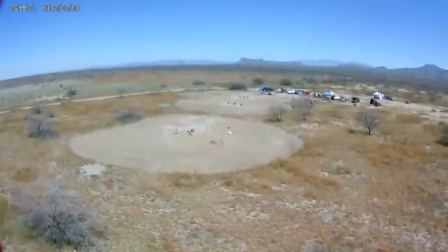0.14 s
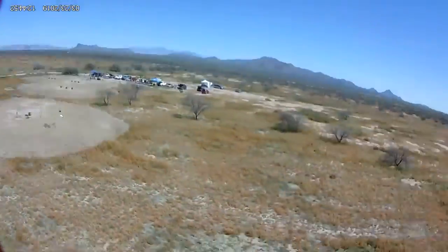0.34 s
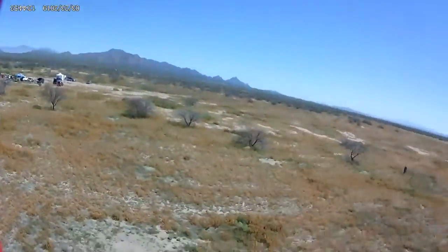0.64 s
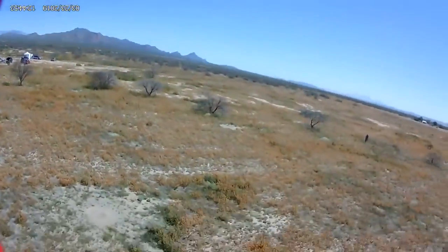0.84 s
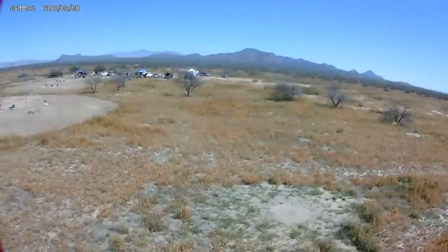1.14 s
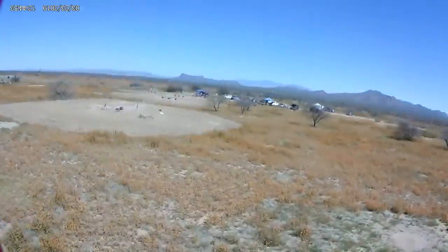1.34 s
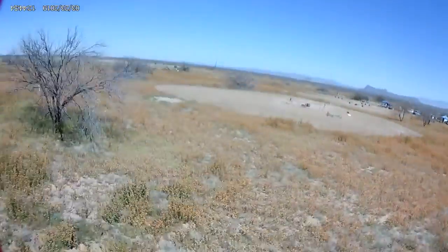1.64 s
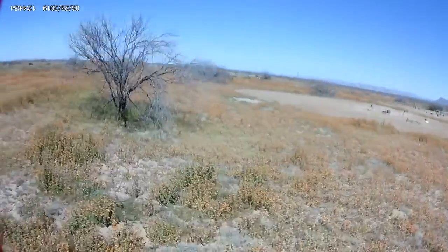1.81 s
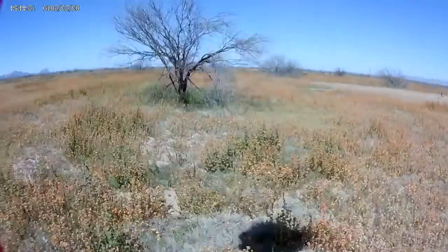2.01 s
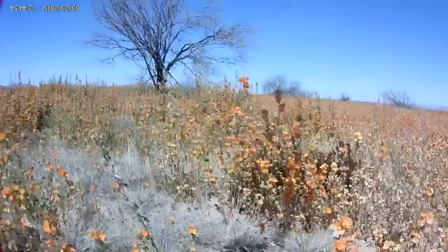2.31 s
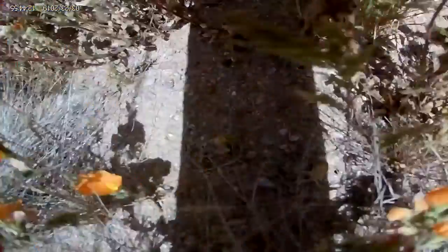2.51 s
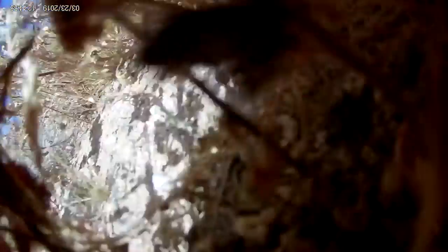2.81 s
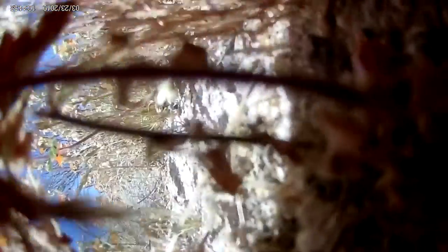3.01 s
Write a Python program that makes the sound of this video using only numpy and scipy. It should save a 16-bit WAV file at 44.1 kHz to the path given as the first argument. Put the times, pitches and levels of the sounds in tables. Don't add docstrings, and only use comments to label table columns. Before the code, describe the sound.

Twigs crack and snap against a hollow case after a quiet, windy descent with sparse ticks; stems knock, heavy blows overload the on-board microphone, then leafy scraping thins out in the open, without echo.

```python
import sys
import numpy as np
from scipy import signal
from scipy.fft import rfft, irfft
from scipy.io import wavfile
from scipy.ndimage import uniform_filter1d

SR = 44100
rng = np.random.default_rng(int(sys.argv[2]) if len(sys.argv) > 2 else 0)


def put_to_file(sound):
    columns = np.atleast_2d(sound).T
    safe = np.clip(columns, -1, 1)
    whole_steps = np.round(safe * 32767)
    wavfile.write(sys.argv[1], SR, whole_steps.astype(np.int16))


def natural_amplitude(level_db):
    exponent = np.asarray(level_db, float) / 20
    return 10 ** exponent


N = 138915


def rms_one(x):
    return x / np.sqrt(np.mean(x ** 2) + 1e-20)


def in_time(rows):
    s, *columns = np.transpose(rows)
    return [np.interp(np.arange(N) / SR, s, column) for column in columns]


def at_hz(points, hz):
    point_hz, point_db = np.transpose(points)
    return np.interp(np.log(hz), np.log(point_hz), point_db)


def drift(rate):
    r = np.exp(-80 * np.pi * rate / SR)
    slow = signal.lfilter([1], [1, -2 * r, r * r], rng.standard_normal(N // 40 + 2002))
    slow = rms_one(slow[2000:])
    return np.interp(np.arange(N) / 40, np.arange(len(slow)), slow)


def filtered(x, order, hz, kind="low"):
    return signal.sosfilt(signal.butter(order, hz, kind, fs=SR, output="sos"), x)


def ring(force, hz, t60):
    r, w = natural_amplitude(-60 / (t60 * SR)), 2 * np.pi * hz / SR
    return signal.lfilter([0, np.sin(w)], [1, -2 * r * np.cos(w), r * r], force + 1e-18)


def add(out, s, sound):
    i = int(s * SR)
    out[i:i + len(sound)] += sound[:N - i]


def strikes(events, modes, width, tilt_db, grit_hz, attack_s):
    case_spread_db, grit_fade_db_per_s = 2.0, 1496
    soft_contact = 2.61
    out, t = np.zeros(N), np.arange(SR // 4) / SR
    first_touch = t == t[40]
    grit = rng.standard_normal((len(events), len(t)))
    spread = rng.standard_normal((len(events), len(modes) + 1))
    for (s, db, hz, t60, last_db), rough, chance in zip(events, grit, spread):
        force = rough * natural_amplitude(-60 * t / max(t60, .003)) * np.minimum(t / attack_s, 1)
        crack = ring(force, hz, 6.84 / (width * hz))
        dull = filtered(force * natural_amplitude(-grit_fade_db_per_s * t), 3, grit_hz)
        grit_db = tilt_db if modes else last_db
        sound = crack / np.abs(crack).max() + natural_amplitude(grit_db) * dull / np.abs(dull).max()
        if modes:
            body = np.zeros(len(t))
            for (mode_hz, mode_db, mode_t60), luck in zip(modes, chance):
                body += natural_amplitude(mode_db + case_spread_db * luck) * ring(first_touch, mode_hz, mode_t60)
            sound = sound + natural_amplitude(last_db) * body / np.abs(body).max()
            sound = filtered(sound, 4, min(grit_hz, soft_contact * hz))
        add(out, s, natural_amplitude(db) * sound)
    return filtered(out, 2, 260, "high")


def wind():
    # time in seconds, level in dB, brightness in dB per octave.
    gusts = [(0, -61.5, -9), (.12, -52, 5), (.23, -45.5, 3.5), (.5, -49, -1), (.8, -57.5, -1.5),
             (1.0, -50, 5), (1.25, -47, 2.5), (1.6, -44.5, 4.5), (1.9, -46.5, 3), (2.08, -46.5, 0),
             (2.13, -54.5, -5), (2.4, -54, -5.5), (2.7, -62, -4.5), (2.95, -61.5, -1), (3.15, -62.5, 6)]
    # pitch in Hz, level in dB per Hz.
    wind_colour = [(15, -36), (25, 5), (147, 7.5), (408, -0.5), (477, -8.5), (545, -12.5), (650, -13),
                   (1290, -30), (5000, -128), (6500, -99), (11000, -120)]
    patchy_db = .8
    level_db, tilt_db = in_time(gusts)
    out, shared, white = 0, drift(7.0), rng.standard_normal((2, N))
    edges = 20 * 2 ** np.arange(0, 8.4, 1 / 3)
    for k, (low, high) in enumerate(zip(edges, edges[1:])):
        band = filtered(white[k % 2], 2, [low, high], "band")
        hz = np.sqrt(low * high)
        lumps_db = patchy_db * (.35 * shared + drift(9.0))
        out = out + band * natural_amplitude(at_hz(wind_colour, hz) + tilt_db * np.log2(hz / 250) + lumps_db)
    out = filtered(out, 4, 2050)
    return natural_amplitude(level_db) * out / np.sqrt(uniform_filter1d(out ** 2, size=30000))


def rigging_ticks():
    # start in seconds, peak in dB, contact pitch in Hz, contact t60 in seconds, ring in dB.
    ticks = [(.51, -56, 1180, .02, -4), (.737, -54, 1120, 0.016, -8), (.844, -48.5, 1010, 0.021, -17),
             (.8853, -45.5, 3800, 0.0093, -5), (.8875, -27.5, 1730, 0.025, -3.5),
             (.965, -66, 4000, 0.43, -10), (1.0095, -43, 1190, 0.02, -0.5), (1.145, -67, 4450, .15, -6),
             (1.2158, -37.5, 1560, 0.037, 2.5), (1.228, -61, 4100, 0.23, 8), (1.334, -48, 1000, 0.043, -21),
             (1.871, -51, 1290, 0.047, -4), (2.06, -55, 1810, 0.092, 10), (2.167, -43, 1000, 0.042, -13),
             (2.353, -56.5, 3600, 0.032, 4.5), (2.436, -40, 834, 0.031, -6), (2.437, -56.5, 4180, .04, -22)]
    # pitch in Hz, level in dB, t60 in seconds.
    lid = [(612, 26.5, 0.087), (825, 24, 0.067), (1000, 4, 0.081), (1417, 20, .04), (1650, 8.5, 0.11),
           (2270, 15.5, 0.039), (2710, 6, 0.044), (4000, 8, 0.03)]
    return strikes(ticks, lid, width=0.41, tilt_db=-39, grit_hz=4100, attack_s=0.0014)


def drag():
    # time in seconds, level in dB, brightness in dB per octave.
    scrape = [(2.44, -63.5, -10.5), (2.49, -54.5, -9.5), (2.55, -25.5, -2), (2.6, -22, -5.5),
              (2.672, -36.5, 0), (2.69, -57, -2), (2.708, -39, 6.5), (2.727, -27, 16.5),
              (2.74, -28.5, -0.5), (2.8, -15, 5.5), (2.86, -19.5, 1), (2.9, -29, -0.5), (2.965, -34.5, 2.5),
              (3.0, -29.5, -0.5), (3.02, -26, 4), (3.07, -38.5, -4), (3.09, -46, -2.5), (3.15, -42, 2)]
    # pitch in Hz, level in dB per Hz.
    scrape_colour = [(250, -15), (620, 5), (1200, -7), (1800, -6), (2770, -7.5), (4700, -7), (6500, -40),
                     (7800, -28.5)]
    grains_per_s, grain_spread_db, grain_cycles = 16000, 2.8, 9.0
    level_db, tilt_db = in_time(scrape)
    sizes = natural_amplitude(grain_spread_db * np.minimum(rng.exponential(1, N), 3.5)) * rng.choice([-1, 1], N)
    clicks = sizes * (rng.random(N) < grains_per_s / SR)
    pitches, dealt = np.geomspace(300, 7500, 28), rng.integers(0, 28, N)
    patches = [natural_amplitude(3.1 * drift(25.0)) for _ in range(7)]
    out = np.zeros(N)
    for k, hz in enumerate(pitches):
        grains = rms_one(ring(clicks * (dealt == k), hz, grain_cycles / hz))
        colour = natural_amplitude(at_hz(scrape_colour, hz) + tilt_db * np.log2(hz / 2500)) * np.sqrt(hz)
        out += colour * patches[k // 4] * grains
    out = filtered(out, 2, 280, "high")
    return natural_amplitude(level_db + 0.27 * drift(58.0)) * rms_one(out)


def stem_knocks():
    # start in seconds, peak in dB, contact pitch in Hz, contact t60 in seconds, ring in dB.
    knocks = [
        (2.1897, -20, 2570, 0.01, -6),
        (2.1918, -13.5, 2170, 0.014, 3.5),
        (2.2303, -25.5, 1480, 0.014, -4.5),
        (2.26, -40, 2920, 0.028, 11),
        (2.2808, -13.5, 1650, 0.018, 1),
    ]
    # pitch in Hz, level in dB, t60 in seconds.
    case = [(802, 0, .058), (985, -12, .04), (1362, -9, .04), (1637, -7, .038), (2148, -9, .03),
            (2735, -22, .045), (4000, -20, .025)]
    return strikes(knocks, case, width=0.64, tilt_db=-4.5, grit_hz=4810, attack_s=0.0017)


def twig_snaps():
    # start in seconds, peak in dB, pitch in Hz, t60 in seconds, broad grit in dB.
    snaps = [(2.464, -37, 1800, 0.032, -5.5), (2.492, -41.5, 1650, 0.027, -8),
             (2.507, -34.5, 3800, 0.063, -10), (2.535, -39, 4000, 0.093, -13),
             (2.5562, -10, 3800, 0.037, -3), (2.5775, -10, 1630, 0.023, -23),
             (2.5945, -25, 2000, .025, -14), (2.6115, -23, 1590, 0.013, -23),
             (2.6395, -27, 4200, 0.017, -16), (2.708, -31.5, 3000, .06, -17), (2.72, -31, 2820, 0.064, -15),
             (2.727, -33.5, 2520, 0.032, -17), (2.744, -37, 1650, 0.029, -12),
             (2.761, -32, 2470, 0.021, -3), (2.7934, 13, 2067, 0.0088, -8), (2.812, -36, 4500, 0.081, -19),
             (2.8262, -18.5, 3070, 0.043, -12), (2.8285, -11, 1430, 0.042, -7),
             (2.834, -14, 3430, 0.029, -25), (2.85, -30, 3530, 0.022, -5), (2.872, -30, 2470, 0.04, -17),
             (2.902, -37, 1470, 0.027, 1), (2.9138, -32.5, 2550, 0.036, -9), (2.941, -40, 2300, .025, -9),
             (2.951, -31, 2400, 0.074, -2.5), (2.9822, -33.5, 1700, 0.04, -1), (3.0025, -47, 2130, .02, -9),
             (3.011, -29.5, 2140, 0.074, -8), (3.0165, -22.5, 2350, 0.011, -4.5),
             (3.0635, -43, 990, 0.03, -11), (3.139, -48.5, 1690, .082, -8)]
    # start in seconds, peak in dB, pitch in Hz, t60 in seconds, broad grit in dB.
    splinters = [(2.558, -13, 11000, 0.034, 0), (2.569, -35, 10500, 0.03, -6),
                 (2.6395, -35.5, 10300, 0.0068, -6), (2.719, -32.5, 9550, 0.043, -10),
                 (2.725, -29, 10700, 0.027, -9), (2.887, -50, 12000, .02, -10),
                 (2.905, -58, 9500, .04, -10), (2.951, -49, 10300, 0.014, -4),
                 (2.9825, -53, 10500, 0.013, -9), (3.011, -37, 9200, .02, -13),
                 (3.0165, -36, 10100, 0.016, -18)]
    cracks = strikes(snaps, [], width=0.55, tilt_db=0, grit_hz=7800, attack_s=0.00051)
    return cracks + strikes(splinters, [], width=1.1, tilt_db=0, grit_hz=15000, attack_s=0.00028)


def frame():
    # start in seconds, level in dB, pitch in Hz, t60 in seconds.
    ringing = [(2.192, -23.5, 468, 0.072), (2.281, -32, 264, 0.068), (2.282, -31.5, 590, 0.079),
               (2.6392, -9, 1598, 0.017), (2.6394, -12.5, 985, .018), (2.6394, -21.5, 670, 0.032),
               (2.64, -26, 250, 0.03), (2.7906, -7.5, 358, 0.061), (2.8688, -28.5, 255, 0.034),
               (2.579, -24, 1400, 0.11), (2.579, -21, 280, 0.013), (2.599, -23.5, 1358, 0.093),
               (2.612, -38, 1335, 0.069), (2.585, -30, 635, 0.21), (2.641, -38.5, 635, 0.67),
               (2.193, -31, 1050, 0.03), (.888, -48, 654, 0.046), (.889, -52, 815, .1),
               (1.216, -33, 630, 0.061), (1.7, -40, 1000, 0.057), (2.8, -15.5, 510, 0.034),
               (2.4, -54, 440, 0.84), (2.64, -29.5, 170, 0.096), (2.4, -48, 890, 0.27),
               (3.03, -66, 685, 0.08)]
    out, t = np.zeros(N), np.arange(SR // 2) / SR
    for s, db, hz, t60 in ringing:
        attack = np.minimum(t / min(.002, t60 / 40), 1)
        add(out, s, natural_amplitude(db - 60 * t / t60) * attack * np.sin(2 * np.pi * hz * t))
    return out


def blows():
    # start in seconds, level in dB, first pitch in Hz, last pitch in Hz, length in seconds.
    hits = [
        (2.559, 3.5, 1108, 381.4, 0.017),
        (2.56, -3.5, 154.8, 124, 0.018),
        (2.573, -10, 1570, 1570, 0.0026),
        (2.594, -10.5, 1376, 1780, 0.0027),
        (2.639, -9.5, 890, 1090, 0.00047),
        (2.782, -26.5, 690, 626, 0.0051),
        (2.7903, -0.5, 488.3, 609, 0.014),
        (2.794, -18, 244, 145, 0.0071),
        (2.8294, -8.5, 490, 553, 0.0038),
        (2.868, -20.5, 450, 343, 0.0049),
    ]
    release_s, wobble_amount, grit_db, attack_cycles = 0.0019, 0.312, -9.5, 0.21
    out, t = np.zeros(N), np.arange(SR // 10) / SR
    chance = rng.standard_normal((len(hits), 2, len(t)))
    for (s, db, first_hz, last_hz, length), (wobble, rough) in zip(hits, chance):
        glide = first_hz * (last_hz / first_hz) ** np.minimum(t / length, 1)
        slow_wobble = uniform_filter1d(uniform_filter1d(wobble, size=40), size=40)
        pitch = glide * np.exp(wobble_amount * rms_one(slow_wobble))
        attack = np.minimum(t * first_hz / attack_cycles, 1)
        shape = attack * np.exp(-np.maximum(t - length, 0) / release_s)
        tone = np.sin(2 * np.pi * np.cumsum(pitch) / SR)
        grit = natural_amplitude(grit_db) * rms_one(ring(rough, 1100, 0.00083)) * np.exp(-t / length)
        add(out, s, natural_amplitude(db) * shape * (tone + grit))
    return out


def squash(x, top, hardness):
    return top * x / (top ** hardness + np.abs(x) ** hardness) ** (1 / hardness)


def scene():
    flight = wind() + rigging_ticks()
    shrub = drag() + stem_knocks() + twig_snaps()
    return (flight + shrub + frame() + blows())[None]


def roll_off(x):
    return signal.sosfilt(signal.butter(12, 16470, fs=SR, output="sos"), x)


def record(dry):
    native_rate, edge_hz = 16000, 6590
    loud = squash(dry, top=0.28, hardness=4.0)
    leak = natural_amplitude(-7.5) * filtered(loud, 3, [8700, 12700], "band")
    x = filtered(loud, 10, edge_hz)
    x = filtered(x, 1, 53, "high")
    mirror = rfft(2 * x * np.cos(2 * np.pi * native_rate * np.arange(N) / SR))
    khz = (np.arange(N // 2 + 1) * SR / N - native_rate / 2) / 1000
    mirror_db = -3 - 7 * khz - 0.6145 * khz ** 2
    mirror = irfft(mirror * natural_amplitude(mirror_db) * np.clip(khz / 0.48, 0, 1), N)
    x = filtered(x + mirror + leak, 6, 14800)
    hiss = natural_amplitude(-90) * rng.standard_normal(x.shape)
    return roll_off(squash(x, top=.335, hardness=12.0) + hiss)


dry = scene()
out = record(dry)
put_to_file(out)
```